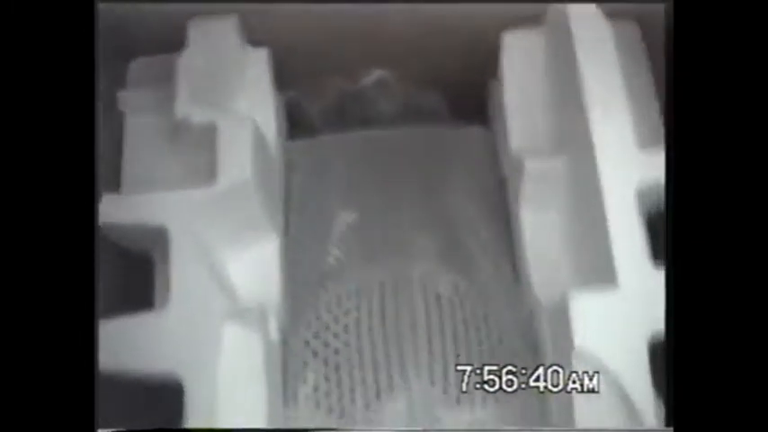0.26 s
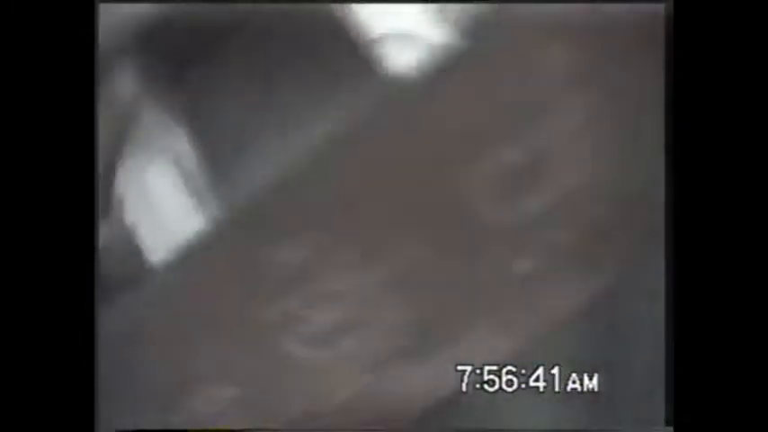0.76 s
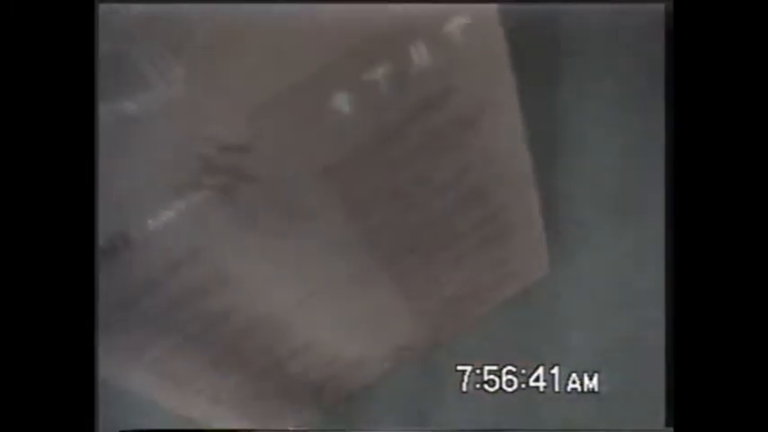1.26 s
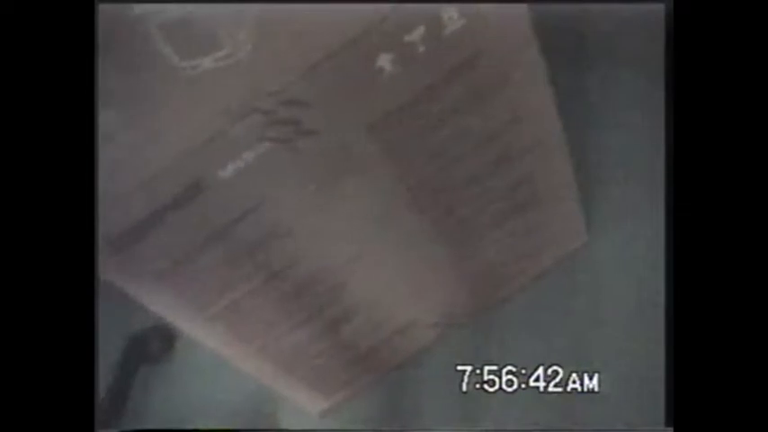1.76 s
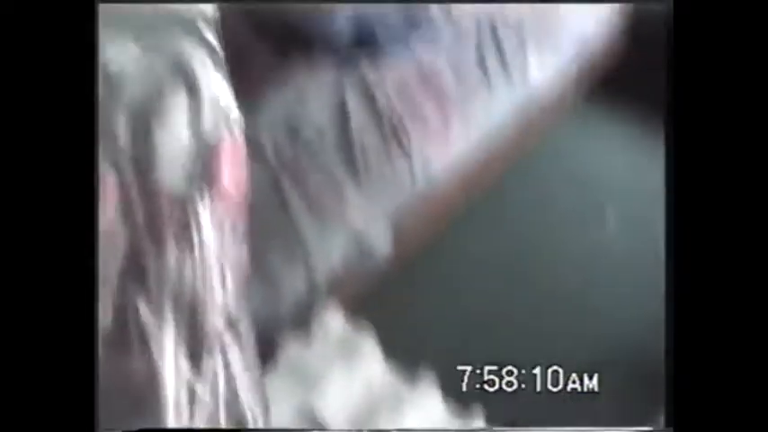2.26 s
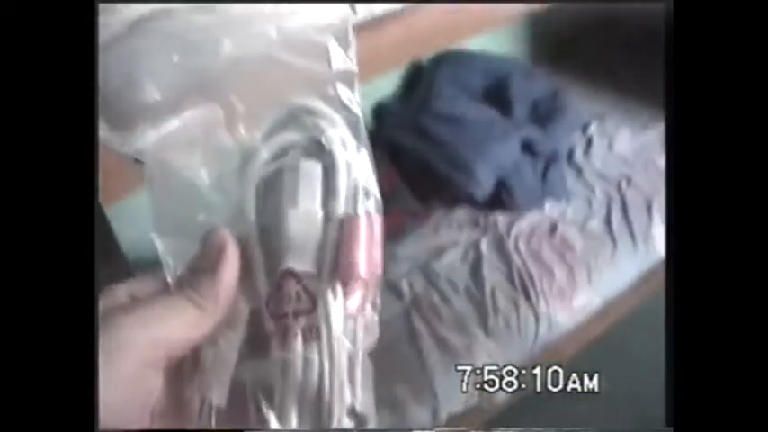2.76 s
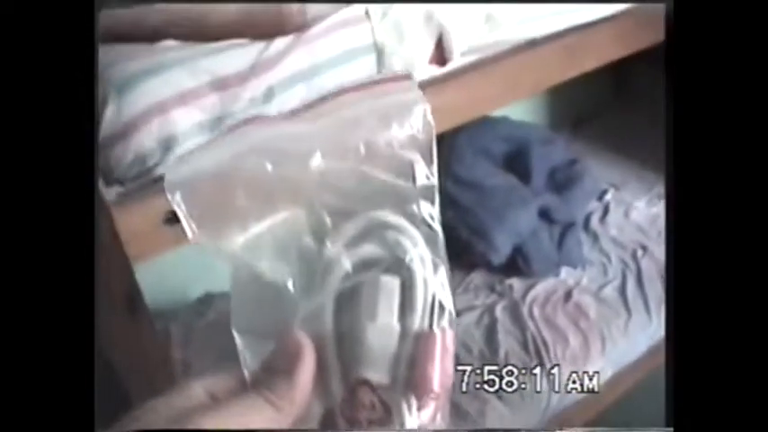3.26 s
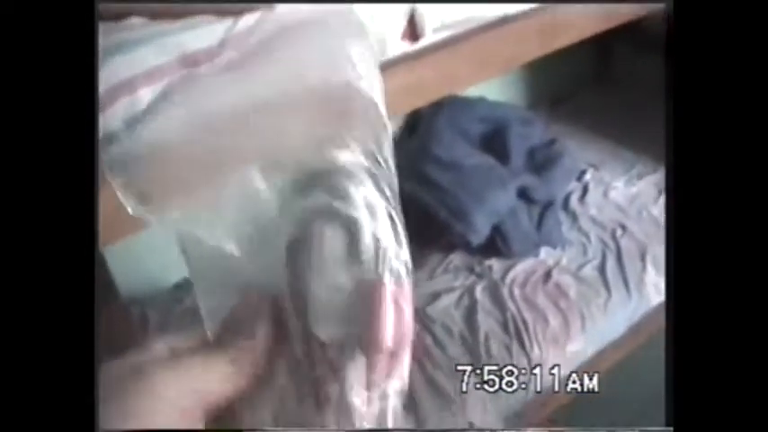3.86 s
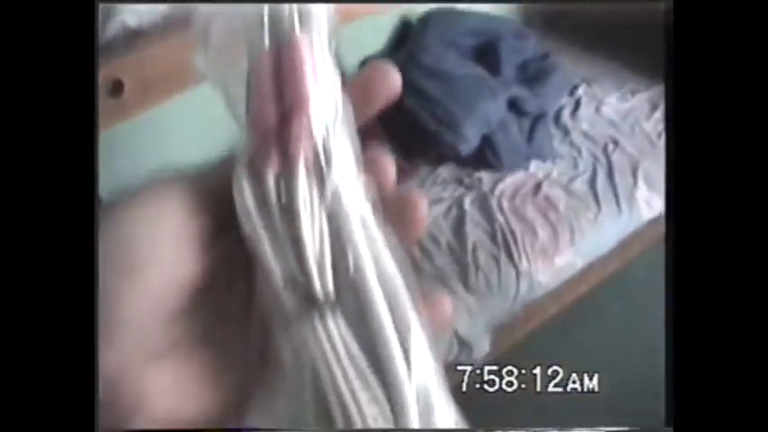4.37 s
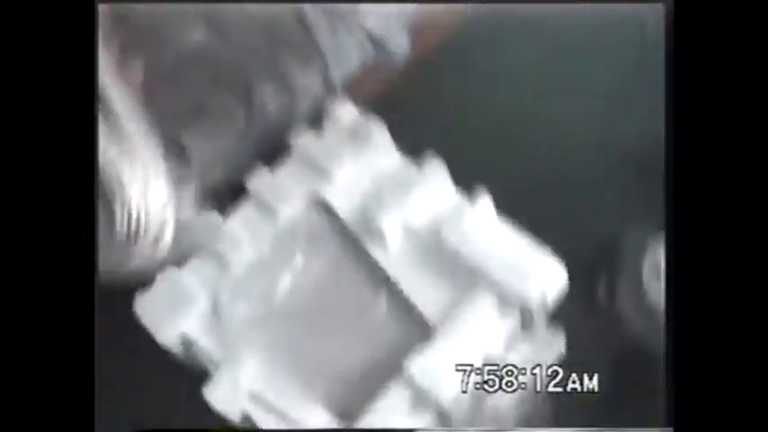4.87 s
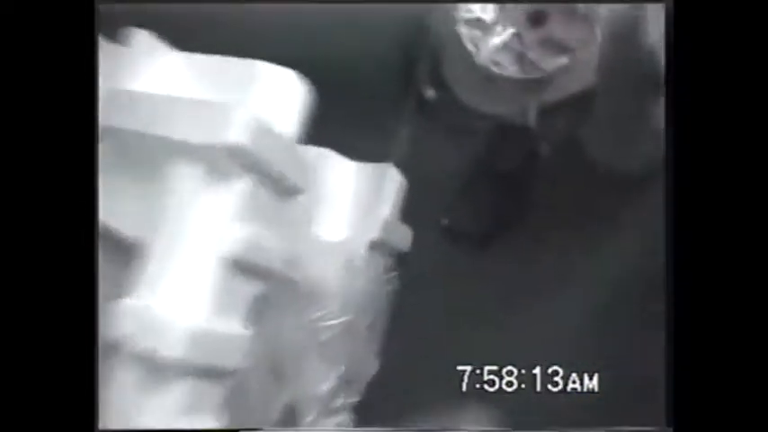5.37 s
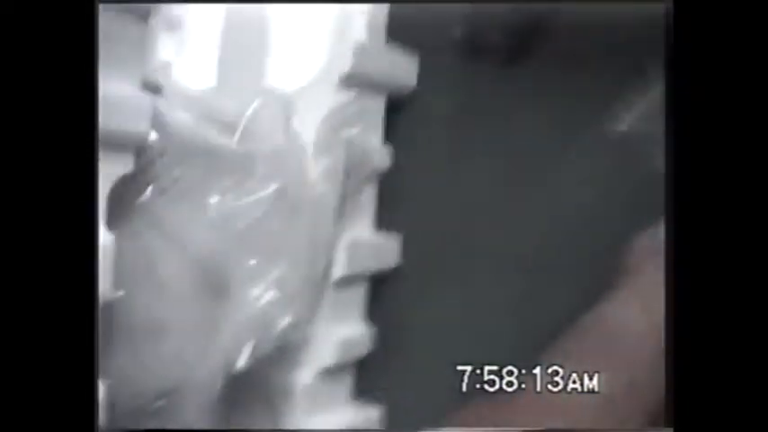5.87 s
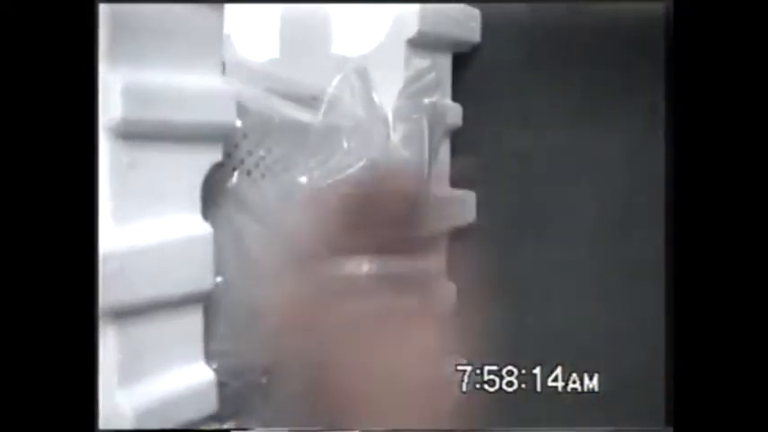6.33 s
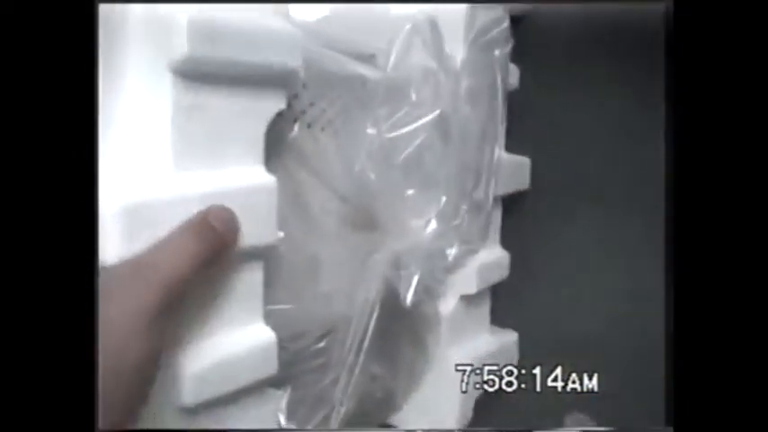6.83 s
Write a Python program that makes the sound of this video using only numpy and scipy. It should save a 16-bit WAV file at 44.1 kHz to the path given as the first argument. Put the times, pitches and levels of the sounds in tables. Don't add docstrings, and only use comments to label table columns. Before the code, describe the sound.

Close to a cheap camcorder microphone in a small dead room, foam rubs against cardboard in uneven scrapes with dull knocks. After lighter slides, a plastic bag gives a few separate ticks, then crackles densely as a fist closes on it. It is swung down and set on foam with a rustle, and fingers tap and rub the block. Low rumble, faint motor whine and hiss continue throughout, the handling lopsided to the right.

```python
import sys
import numpy as np
from scipy import signal
from scipy.io import wavfile
from scipy.ndimage import uniform_filter1d

SR = 44100
rng = np.random.default_rng(int(sys.argv[2]) if len(sys.argv) > 2 else 0)


def level_to_linear(level):
    exponent = np.asarray(level, float) / 20
    return 10 ** exponent


def wrap_up_sound(samples):
    columns = np.atleast_2d(samples).T
    tamed = np.clip(columns, -1, 1)
    steps = np.round(tamed * 32767).astype(np.int16)
    wavfile.write(sys.argv[1], SR, steps)


N = 313110

# f/Hz, density/dB [dB per Hz]
FLOOR_SPECTRUM = [(3, 4.5), (20, 1), (60, -3.5), (97, -7.5), (150, -27.5), (260, -14.5), (500, -20),
                  (1300, -20.5), (3000, -25), (6000, -27.5), (10000, -29), (15700, -32)]
# f/Hz, level/dB
MOTOR_TONES = [(1077, -74), (1620, -72.5), (2159, -101), (3036, -75)]
# t/s, low-tone level/dB, top-tone level/dB
MOTOR_SHELTER = [(0, 2, 2), (1.5, 1.5, -0.5), (2.0, 3.5, 1.5), (2.8, 1.5, 0), (3.4, 1.8, 0), (4.15, 0.5, 6),
                 (4.45, 2.5, 1.5), (4.8, 3.5, 7), (5.8, -1.5, 2), (6.3, 0, -1), (7.1, 0.3, 3)]
# f/Hz, density/dB [dB per Hz]
OPEN_INPUT_SPECTRUM = [(50, -47.5), (300, -22), (800, -17.5), (1500, -13.5), (3000, -5.5), (5000, -2),
                       (8000, -0.5), (14000, -0.5)]
# f/Hz, level/dB
MAINS_HARMONICS = [(50, -101), (150, -100), (250, -101), (350, -105)]
# t/s, level/dB, f/Hz, t60/s
PANEL_KNOCKS = [(0.359, -47, 219, 0.24), (0.429, -46, 235, 0.15), (0.529, -40.5, 201, 0.14),
                (.575, -27.5, 590, 0.036), (1.618, -47, 208, 0.173), (1.821, -43.5, 247, 0.087),
                (1.9, -44.5, 190, 0.18), (2.135, -36, 242.4, 0.085), (2.18, -38, 338, 0.089),
                (2.31, -39, 125, 0.16), (2.845, -36, 207, 0.054), (3.272, -47, 219, 0.12),
                (3.645, -37, 149, 0.21), (3.717, -34, 167, 0.16), (3.856, -35.5, 154, 0.1665),
                (4.042, -37.5, 166, 0.164), (4.655, -41.5, 188, 0.115), (5.441, -38, 177, 0.1),
                (5.503, -37, 181.4, 0.057), (5.7, -43.5, 208.6, .06), (6.217, -31, 224.5, 0.16),
                (6.216, -28.5, 497.3, .07), (6.711, -37, 203, 0.088), (6.994, -32.5, 245.2, 0.12),
                (7.019, -38.5, 130, 0.115)]
# middle t/s, length/s, level/dB, f/Hz, glide [share of f]
FINGER_SQUEAKS = [(1.777, .05, -59.5, 5010, -0.015), (2.034, .06, -61, 5170, -0.023),
                  (2.145, .03, -56.5, 5730, 0.029), (2.325, .04, -63, 5060, -0.013),
                  (2.372, .02, -56, 6000, -0.005), (2.423, .045, -59, 3650, 0.0057),
                  (3.006, .03, -59, 4790, 0.001), (3.143, .06, -57.5, 4200, -0.044),
                  (3.178, .03, -63, 3800, 0.0041), (3.277, .03, -60, 2310, 0.0042),
                  (3.269, .025, -60, 934, 0.001), (4.408, .04, -61, 1313, 0.001),
                  (4.518, .02, -62.5, 3500, 0.001), (4.768, .03, -53.5, 2036, 0.027),
                  (5.624, .015, -53, 8920, -0.015)]

# peak t/s, rise/s and fall/s [per 10 dB], fizz level/dB, weight/dB [body over fizz]
FOAM_STROKES = [(.07, 0.15, 0.06, -52.5, -2), (.17, 0.5, -0.13, -55, -2), (.28, 0, 0.03, -54, -5.5),
                (.42, 0.17, 0.12, -50, 5), (.51, 0.15, 0.05, -49, -7), (.66, -0.4, 0.1, -61, -0.5),
                (.738, -0.1, 0.06, -51.5, -2.5), (.85, 0.03, 0.07, -48, -9.5), (.9, 0.15, 0, -52.5, -7),
                (.962, .035, .055, -47, -9.5), (1.04, 0, 0.04, -55.5, -4), (1.14, 0.25, 0.03, -56, -4.5),
                (1.225, 0.04, 0.095, -50.5, -0.5), (1.285, 0.14, -0.05, -51.5, -1.5),
                (.24, 0.06, 0.08, -55, -8), (.55, 0.03, 0.08, -63, 5), (1.912, 0.1, 0.05, -62.5, 4.5)]
SETTLING_STROKES = [
    (1.38, 0.083, 0.047, -56, -19),
    (1.47, 0.082, .16, -54, -19),
    (1.61, 0.072, 0.12, -50.5, -6),
    (1.715, 0.057, 0.067, -56, -7),
]
FINGER_STROKES = [(6.37, .01, 0.03, -42, -13), (6.395, 0.022, 0.045, -42.5, -12.5),
                  (6.463, 0.01, 0.027, -40, -13.5), (6.48, 0.019, 0.0102, -39, -17),
                  (6.538, 0.026, 0.024, -43.5, -7), (6.594, 0.0031, 0.056, -42, -4),
                  (6.66, 0.045, 0.047, -46.5, -2), (6.71, 0.0356, 0.068, -39, -1.5),
                  (6.765, 0.058, 0.082, -34, -6), (6.86, 0.07, 0.106, -41.5, -4),
                  (6.96, .06, 0.18, -43, -2), (7.033, 0.045, 0.05, -31, -7)]
HAND_TAP = [
    (6.214, 0.0072, 0.024, -34.5, -6),
    (6.224, 0.012, 0.011, -29.5, -16),
    (6.25, 0.014, 0.04, -47, -8),
    (6.28, 0.015, 0.049, -59, -7),
]
BAG_MOVES = [(2.065, 0.03, 0.16, -62, 9), (2.142, 0, 0.06, -58, 5), (2.372, -0.03, -0.06, -64.5, 0),
             (2.455, 0.17, 0.07, -71, 10.5), (2.645, 0.04, 0.1, -62.5, 9), (2.735, 0.07, 0.05, -59, 4),
             (2.824, 0.004, 0.015, -60, 0), (3.015, .025, 0.025, -59, -4), (3.17, 0.2, -1.2, -68.5, -2),
             (3.46, 0.4, 0.2, -74, 8), (4.4, 0, 0.5, -69.5, 0), (4.71, -0.06, .04, -71.5, 9),
             (4.752, 0.04, 0.02, -58, 2), (4.8, 0.05, 0.15, -63.5, 8.5), (3.87, 0.17, 0.0644, -60, 13),
             (4.05, 0.2, -0.04, -67, 8.5), (4.96, 0.06, 0.15, -55.5, 6), (5.365, 0.01, 0.0614, -51, 7),
             (5.645, -0.04, 0.15, -58, 4.5), (5.825, 0.12, 0, -54, 7.5)]
BAG_SQUEEZES = [(3.618, 0.018, .03, -53, 5.5), (3.655, 0.02, .011, -52, 2), (3.695, 0.014, .018, -56, 8),
                (3.725, .014, 0.024, -58, 9), (3.78, 0.039, 0.047, -62.5, 9), (3.86, .025, 0.03, -51, 6),
                (3.9, 0.03, .035, -54, 8), (3.965, 0.034, 0.051, -58, 11), (4.1, 0.031, .026, -60, 5),
                (5.505, 0.022, 0.043, -58, 5.5), (5.545, 0.035, 0.094, -57.5, 3.5)]
BAG_LANDING = [
    (5.02, 0.0397, 0.085, -51.5, 3),
    (5.108, 0.0315, 0.078, -50.5, 1),
    (5.228, 0.044, 0.092, -47.5, 0.3),
    (5.285, 0.03, 0.075, -47, 5),
    (5.674, 0.014, 0.022, -41, 0.5),
    (5.703, 0.0092, 0.012, -37.5, 1),
    (5.717, 0.009, 0.023, -44, 1),
    (5.765, 0.0227, 0.036, -47, 0.5),
    (5.786, .021, 0.032, -46.5, 4),
    (5.88, .03, 0.17, -63, -13),
]

# f/Hz, density/dB [dB per Hz]
FOAM_FIZZ = [(2500, -23.5), (4000, -9), (4900, -2.5), (8300, -5), (10300, -5), (11500, -11), (13000, -18),
             (15700, -25)]
SETTLING_FIZZ = [(3000, -22), (4800, -4.5), (7000, -7), (8800, -3), (9800, -3.5), (11000, -14.5),
                 (15700, -19)]
FINGER_FIZZ = [(2500, -27), (3800, -7.5), (5500, -4.5), (8000, -2.5), (10000, -5), (12500, -12),
               (15700, -23.5)]
HAND_TAP_FIZZ = [(3300, -23), (3800, 5.5), (4500, -9), (5200, -10), (5800, -4.5), (7500, 2), (9500, 0),
                 (12500, -13.5)]
BAG_FIZZ = [(2500, -29), (3800, -6.5), (5500, -0.5), (8300, 0), (10000, -4), (12000, -15), (15700, -28)]
SLIP_BODY = [(600, -43.5), (1000, 0), (1600, -3.5), (2800, -1.5), (4600, -0.5), (8000, -18.5)]
BOX_BODY = [(600, -28.5), (900, -0.5), (1700, -2), (2400, -6), (4600, -3.5), (8000, -19)]
SLIP_THUMP = [(150, -19.5), (280, -11.5), (400, -8.5), (550, 0), (850, -8), (1300, -37)]
CABLE_COLOUR = [(70, -37), (130, -12), (250, -3.5), (450, -1.5), (700, -1.5), (1300, -28.5)]

# t/s, level/dB, centre f/Hz, spread [octaves]
LOOSE_SNAPS = [(.5763, -42, 900, 0.54), (1.9088, -36.5, 900, 0.31), (2.0534, -32, 1100, 0.2),
               (2.0676, -29, 2570, 0.76), (2.139, -29.5, 3280, 0.82), (2.1717, -37.5, 5340, 0.85),
               (2.3475, -22, 8440, 0.25), (2.3475, -26.5, 1700, 0.75), (2.82, -26, 1510, 0.76),
               (2.732, -29.5, 910, 0.5), (2.3699, -29.5, 3920, 0.81), (2.6427, -38, 2740, 0.87),
               (2.6849, -27, 2400, 0.8), (2.703, -27.5, 2950, 0.79), (2.7309, -18.5, 2890, 0.78),
               (2.773, -30, 1870, 0.65), (2.8194, -23, 6000, 0.83), (3.009, -32, 3900, 1.45),
               (3.102, -35.5, 2400, 0.21), (3.4562, -29, 2090, 0.675), (4.1706, -29.5, 2480, 0.56),
               (4.7488, -26, 3390, 0.86), (4.768, -37, 2510, 0.53)]
FIST_SNAPS = [(3.5965, -30, 2580, 0.92), (3.6112, -17, 6480, 0.62), (3.6158, -22, 6020, 0.76),
              (3.627, -21, 4200, 0.63), (3.638, -19.5, 6600, 0.35), (3.65, -22, 5770, 0.82),
              (3.655, -21, 5554, 0.83), (3.6614, -19, 2700, 0.94), (3.678, -19, 4440, 0.81),
              (3.6878, -20, 4470, 0.82), (3.698, -23, 3800, .6), (3.709, -17, 4520, .6),
              (3.719, -16.5, 3100, 1), (3.7374, -20, 7450, 0.43), (3.7501, -16.5, 3440, 0.77),
              (3.8132, -18, 6900, 0.49), (3.855, -16.5, 3100, 0.5), (3.865, -17, 3880, 0.69),
              (3.8713, -16.5, 5600, 0.96), (3.889, -16.5, 2730, 0.4), (3.898, -20, 2720, .24),
              (3.9165, -18.5, 7040, 0.64), (3.9351, -21, 4760, 0.81), (3.972, -16, 4520, 0.72),
              (3.9763, -18.5, 2410, 0.32), (4.0104, -21.5, 4700, 0.8), (4.0787, -21.5, 6100, .56),
              (4.0901, -18.5, 2950, 0.62), (4.0899, -25, 1250, 0.7), (4.0886, -24.5, 8900, 0.35),
              (3.8128, -25, 1800, 0.71), (4.0105, -29, 2500, 0.37), (3.6153, -22, 9650, 0.14),
              (4.115, -23, 4430, 0.97)]
SWING_SNAPS = [(4.9524, -26.5, 2960, 0.87), (4.978, -26, 2840, 1.02), (5, -25, 3466, 0.52),
               (5.0144, -23, 3780, 0.85), (5.0251, -25.5, 3200, 0.63), (5.1121, -18.5, 3440, 0.26),
               (5.2179, -25, 4213, 0.39), (5.2357, -20, 5440, 0.67), (5.2507, -17.5, 6400, 0.86),
               (5.2706, -18, 2350, 0.47), (5.31, -25, 3760, 0.73), (5.3776, -22, 3470, 0.26),
               (5.388, -25, 2835, 0.8), (5.456, -21.5, 7200, 0.7), (5.464, -19, 2560, 0.29),
               (5.481, -45, 6000, 0.9), (5.4974, -18, 3620, 0.87), (5.5344, -22, 2960, 0.067),
               (5.534, -29.5, 690, 0.4), (5.581, -31, 1710, 0.92), (5.625, -28, 7900, 0.46),
               (5.669, -23.5, 2600, 0.41), (5.7015, -18, 4874, 0.68), (5.7062, -20, 6360, 0.91),
               (5.839, -20, 5030, 0.72)]
# t/s, level/dB, centre f/Hz, spread
FURTHER_SNAPS = [(2.0587, -37, 3876, 0.58), (2.1712, -33, 5230, 0.78), (2.446, -37, 2090, 0.87),
                 (2.4677, -30.5, 2690, 0.9), (2.6427, -32.5, 2730, 0.8), (2.6796, -34, 2900, 0.72),
                 (3.1768, -38, 3160, 1), (3.449, -38, 2250, 0.706), (3.4538, -37.5, 2280, 0.87),
                 (3.5936, -40, 3750, 1.3), (3.624, -24, 4900, 0.85), (3.7897, -35.5, 3800, 0.84),
                 (3.8054, -25, 4460, 0.84), (3.8278, -25.5, 2350, 0.45), (3.8416, -24, 2485, 0.76),
                 (3.951, -26, 2990, 0.66), (3.9576, -25, 3750, 0.54), (3.9616, -31, 3240, 0.64),
                 (3.9834, -27, 2170, 0.62), (4.104, -24, 2310, 0.59), (4.1062, -43, 4460, 0.54),
                 (4.25, -46, 2490, 0.77), (4.399, -38, 2530, 0.83), (4.5158, -44.5, 2870, 0.83),
                 (4.703, -41.5, 2340, 0.95), (4.757, -25.5, 3660, 0.67), (4.7682, -35.5, 2443, 0.45),
                 (4.7918, -30.5, 2640, 0.55), (4.9489, -25, 2120, 0.45), (5.0105, -27, 4230, 0.49),
                 (5.051, -27.5, 3160, 0.88), (5.0658, -31, 2160, 0.99), (5.077, -27.5, 4500, 1.3),
                 (5.1065, -23.5, 3750, 0.93), (5.1249, -26, 5400, 0.66), (5.14, -26, 3840, 0.72),
                 (5.194, -26.5, 5550, 0.83), (5.212, -23, 4250, 1.1), (5.2191, -22.5, 4640, 0.83),
                 (5.245, -26, 4540, 0.81), (5.2702, -20.5, 2310, 0.8), (5.295, -23, 4600, 1.24),
                 (5.3458, -22.5, 5030, 0.68), (5.3678, -22, 5100, 0.87), (5.375, -31, 3460, 0.44),
                 (5.4817, -38, 4680, 0.73), (5.6225, -35, 7260, 0.69), (5.7823, -19.5, 3940, 0.94),
                 (2.435, -34, 2650, .8),
    (4.816, -31, 3200, .5),
    (5.675, -20.5, 7500, .6),
    (5.776, -25, 3000, .7),
    (5.8, -27, 3500, .7),
    (6.9462, -21, 5000, .7),
    (6.9871, -19, 6000, .6),
    (7.026, -17, 4500, .6),
    (6.591, -22.5, 4000, .9),
    (3.657, -21, 8800, 0.46),
]

FLOOR_DB, OPEN_DB = -47, -61
OFFSET = -.2655
WIRED_DB = 8
STEP_DB, MASK_DB, FILL_DB, DROP_DB = 21, -3, 5, -3.7
BODY_FOLLOWS, THUMP_FOLLOWS = 0.92, 0.53
THUMP_PER_WEIGHT, THUMP_PER_LEVEL, USUAL_DB = 0.89, -0.27, -46
ROUNDNESS = 1.5


def evened(x):
    return x / np.sqrt(np.mean(x ** 2) + 1e-20)


def read(points, hz):
    f, value = np.transpose(points)
    return np.interp(np.log(hz + 1), np.log(f + 1), value)


def coloured(x, points):
    log_gain = np.log(level_to_linear(read(points, abs(np.fft.fftfreq(8192, 1 / SR)))))
    response = np.exp(np.conj(signal.hilbert(log_gain)))
    taps = np.fft.ifft(response).real[:4096]
    return evened(signal.oaconvolve(x, taps)[:N])


def patchy(x, patchy_db, size=256):
    z = signal.stft(x, nperseg=size)[2]
    across_pitch = uniform_filter1d(rng.standard_normal(z.shape), 6, 0)
    patches = evened(uniform_filter1d(across_pitch, 8, 1))
    return evened(signal.istft(z * level_to_linear(patchy_db * patches), nperseg=size)[1][:N])


def open_input():
    spikes = (rng.random(N) < 330 / SR) * rng.standard_normal(N)
    hiss = coloured(rng.standard_normal(N) + 6.5 * spikes, OPEN_INPUT_SPECTRUM)
    t = np.arange(N) / SR
    buzz = sum(level_to_linear(db) * np.sin(2 * np.pi * hz * t) for hz, db in MAINS_HARMONICS)
    return level_to_linear(OPEN_DB) * hiss + buzz


def camcorder():
    floor = coloured(rng.standard_normal(N), FLOOR_SPECTRUM)
    floor = patchy(floor, patchy_db=1.5)
    floor = level_to_linear(FLOOR_DB) * patchy(floor, patchy_db=1.3, size=1024)
    waver = evened(uniform_filter1d(rng.standard_normal(N), size=900))
    turns = np.cumsum(1 + 0.00599 * waver) / SR
    s, low_db, top_db = np.transpose(MOTOR_SHELTER)
    tones = 0
    for hz, db in MOTOR_TONES:
        shown_db = np.interp(np.arange(N) / SR, s, top_db if hz > 2500 else low_db)
        tones = tones + level_to_linear(shown_db) * level_to_linear(db + WIRED_DB + 1.5) * np.sin(2 * np.pi * hz * turns)
    return floor + tones * (1 + 0.7 * waver[::-1])


def small_room(x):
    t = np.arange(6000) / SR
    echoes = rng.choice([-1., 1.], 6000) * (rng.random(6000) < .05)
    taps = echoes * level_to_linear(-60 * t / .16) * (t > .002)
    return signal.oaconvolve(x, taps / np.linalg.norm(taps))[:N]


def knocks():
    out, t = np.zeros(N + 9000), np.arange(9000) / SR
    for s, db, hz, t60 in PANEL_KNOCKS:
        panel = sum(0.56 * np.sin(2 * np.pi * ratio * hz * t) for ratio in (.7, 1, 1.13, 1.45))
        soft_push = 1 - np.exp(-t * hz / 0.56)
        out[round(s * SR):][:9000] += level_to_linear(db - 60 * t / t60) * soft_push * panel
    return out[:N]


def squeaks():
    out = np.zeros(N)
    wobble = uniform_filter1d(rng.standard_normal((len(FINGER_SQUEAKS), 6000)), size=150, axis=1)
    for (s, length, db, hz, glide), draw in zip(FINGER_SQUEAKS, wobble):
        u = np.linspace(-.5, .5, round(length * SR))
        turns = np.cumsum(hz * (1 + glide * u + 0.06 * draw[:len(u)])) / SR
        whistle = np.cos(np.pi * u) * np.sin(2 * np.pi * turns)
        out[round((s - length / 2) * SR):][:len(u)] += level_to_linear(db + WIRED_DB) * whistle
    return out


def slips(per_s, spread_db, ring_s):
    size_db = spread_db * np.minimum(rng.exponential(1, N), 3)
    size = level_to_linear(size_db) * (rng.random(N) < per_s / SR)
    power = signal.lfilter([1], [1, -np.exp(-1 / (ring_s * SR))], size ** 2)
    return evened(np.sqrt(power) * rng.standard_normal(N))


def rustle(strokes, drive, fizz, thump, heft_db, patchy_db, body=SLIP_BODY):
    peak, rise, fall, fizz_db, weight_db = np.transpose(strokes)[:, :, None]
    t = np.arange(0, N + 32, 32) / SR
    distance = np.where(t < peak, (peak - t) / abs(rise), (t - peak) / abs(fall))
    swell_db = -10 * distance ** ROUNDNESS
    thump_db = heft_db + THUMP_PER_WEIGHT * weight_db + THUMP_PER_LEVEL * (fizz_db - USUAL_DB)
    layers = [(fizz, swell_db),
              (body, weight_db + BODY_FOLLOWS * swell_db),
              (thump, thump_db + THUMP_FOLLOWS * swell_db)]
    drive = patchy(drive, patchy_db)
    out = 0
    for colour, db in layers:
        envelope = np.linalg.norm(level_to_linear(fizz_db + db), axis=0)
        out = out + np.interp(np.arange(N) / SR, t, envelope) * coloured(drive, colour)
    return out


def foam():
    scrape = rustle(FOAM_STROKES, slips(5000, spread_db=-2.0, ring_s=0.0044), FOAM_FIZZ, SLIP_THUMP,
                    heft_db=-10.0, patchy_db=2.0, body=BOX_BODY)
    settle = rustle(SETTLING_STROKES, slips(5000, spread_db=3.0, ring_s=0.0072), SETTLING_FIZZ, SLIP_THUMP,
                    heft_db=-8.0, patchy_db=3.0)
    return scrape + settle


def bag():
    return rustle(BAG_MOVES + BAG_SQUEEZES, slips(900, spread_db=3.0, ring_s=.001), BAG_FIZZ, CABLE_COLOUR,
                  heft_db=-11.0, patchy_db=3.0)


def landing():
    return rustle(BAG_LANDING, slips(3000, spread_db=1.0, ring_s=0.002), BAG_FIZZ, CABLE_COLOUR,
                  heft_db=-12.5, patchy_db=3.0)


def fingers():
    rub = rustle(FINGER_STROKES, slips(4000, spread_db=1.5, ring_s=0.0017), FINGER_FIZZ, SLIP_THUMP,
                 heft_db=-11.5, patchy_db=2.0)
    tap = rustle(HAND_TAP, slips(5000, spread_db=1.0, ring_s=0.002), HAND_TAP_FIZZ, CABLE_COLOUR,
                 heft_db=-3.5, patchy_db=2.0)
    return rub + tap


def snaps():
    rows = LOOSE_SNAPS + FIST_SNAPS + SWING_SNAPS + FURTHER_SNAPS
    out, t = np.zeros(N + 700), np.arange(-100, 600) / SR
    after, place = np.maximum(t, 0), np.linspace(-1.4, 1.4, num=6)[:, None]
    chance = rng.standard_normal((len(rows), 706))
    for (s, db, hz, octaves), draw in zip(rows, chance):
        modes = hz * 2 ** (octaves * (place + .2 * draw[:6, None]))
        ring = np.exp(-0.2 * place ** 2) * np.sin(2 * np.pi * modes * after)
        tick = 3.0 * ring.mean(0) * np.exp(-after / 0.0008) * (1 - np.exp(-after / 0.0003))
        edges = hz / 7.3, min(2.2 * hz, 13000)
        grit = evened(signal.lfilter(*signal.butter(2, edges, "band", fs=SR), draw[6:]))
        creak_and_decay = np.where(t < 0, 0.6 * np.exp(t / 0.00087), np.exp(-after / 0.0022))
        rattle = 0.26 * octaves * grit * creak_and_decay
        at = round(s * SR) - 100
        out[at:at + 700] += level_to_linear(db + 1.5) * (tick + rattle)
    return out[:N]


def scene():
    scraping = foam()
    bag_rustle = bag()
    rubbing = level_to_linear(WIRED_DB - 2.0) * (scraping + landing() + fingers())
    rubbing = rubbing + level_to_linear(WIRED_DB - 3.5) * bag_rustle
    creases = snaps()
    hands = rubbing + creases + level_to_linear(-15) * small_room(creases)
    return np.array([open_input(), hands + squeaks() + knocks() + camcorder()])


def lapped_thinning(x):
    n, k = np.arange(2048), np.arange(1024)
    window = np.sin(np.pi * (n[:, None] + .5) / 2048)
    basis = np.cos(np.pi / 1024 * np.outer(n + .5 + 512, k + .5)) * window
    halves = np.pad(x, (1280, 2048 - (N + 256) % 1024)).reshape(-1, 1024)
    frames = np.hstack([halves[:-1], halves[1:]])
    lines = frames @ basis
    band = np.repeat(np.sqrt((lines ** 2).reshape(-1, 128, 8).mean(2)), 8, axis=1)
    wide = uniform_filter1d(band, size=32, axis=1)
    quiet = np.percentile(wide, 15, axis=0)
    hiss = np.median(quiet[250:450])
    masked = level_to_linear(MASK_DB) * np.sqrt((lines[:, 50:700] ** 2).mean(1, keepdims=True))
    step = np.maximum(hiss * level_to_linear(STEP_DB), masked)
    edges = (np.diff(frames) ** 2)[:, 511:1535].reshape(-1, 16, 64).mean(2)
    smooth = (edges.max(1) < 4 * edges.mean(1))[:, None]
    coarse = smooth & (k > 170) & (wide > np.maximum(quiet, hiss) * level_to_linear(FILL_DB))
    audible = (band > quiet * level_to_linear(DROP_DB)) | (k < 100)
    lines = np.where(coarse, step * np.round(lines / step), lines * audible)
    back = lines @ basis.T / 512
    return (back[1:, :1024] + back[:-1, 1024:]).ravel()[256:256 + N]


def roll_off(x):
    return signal.sosfilt(signal.butter(12, 15880, fs=SR, output="sos"), x)


def record(dry):
    edge = signal.firwin(401, 15800, window=("kaiser", 9), fs=SR)
    thinned = np.array([lapped_thinning(side) for side in dry])
    tape = signal.oaconvolve(thinned, edge[None], "same")
    return roll_off(tape + [[0], [OFFSET]])


dry = scene()
out = record(dry)
wrap_up_sound(out)
```